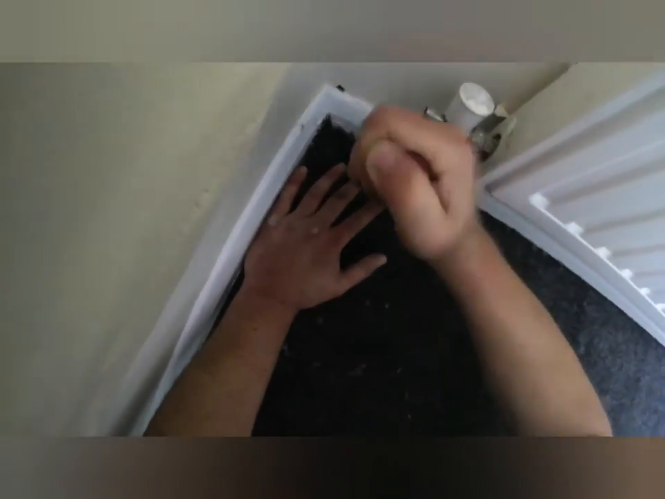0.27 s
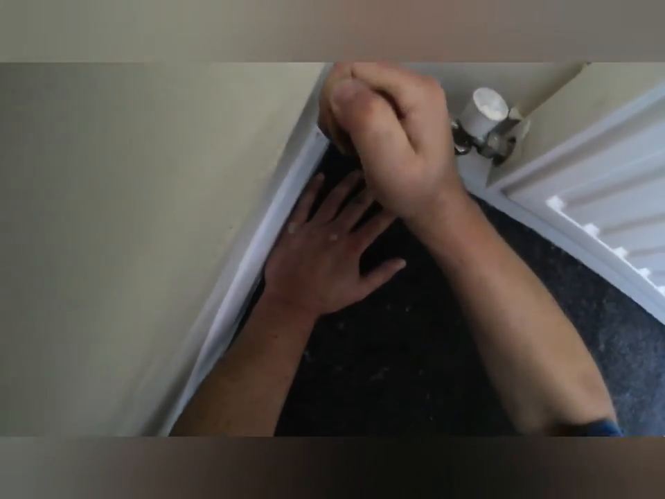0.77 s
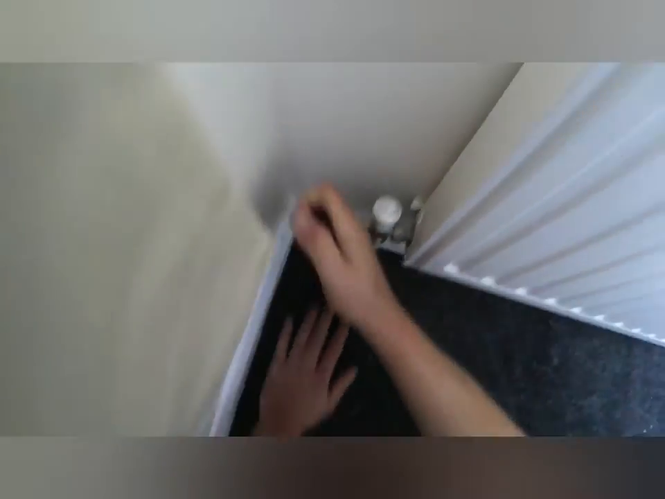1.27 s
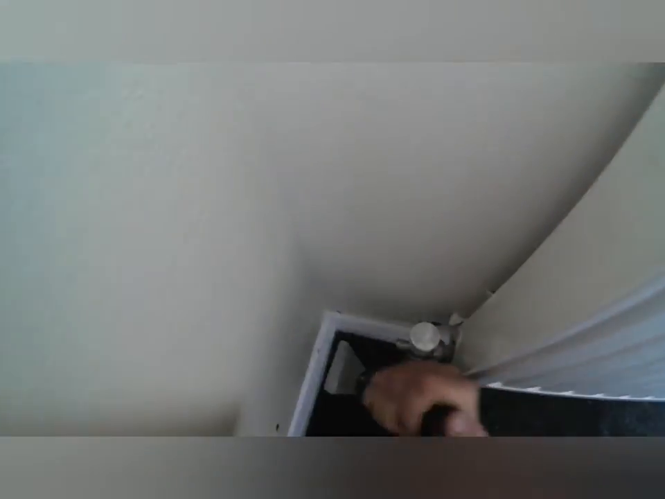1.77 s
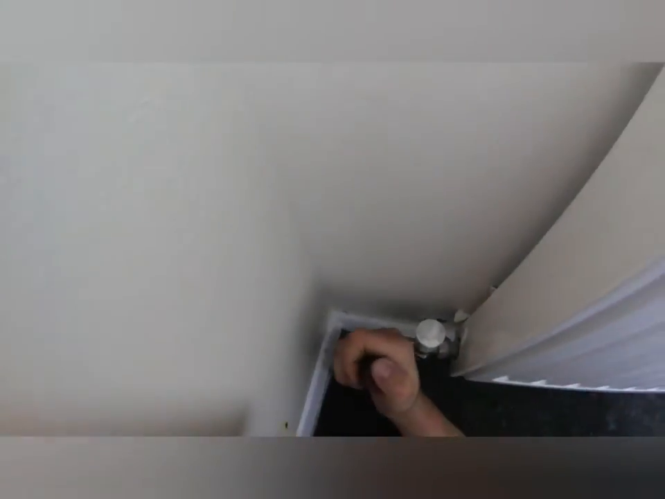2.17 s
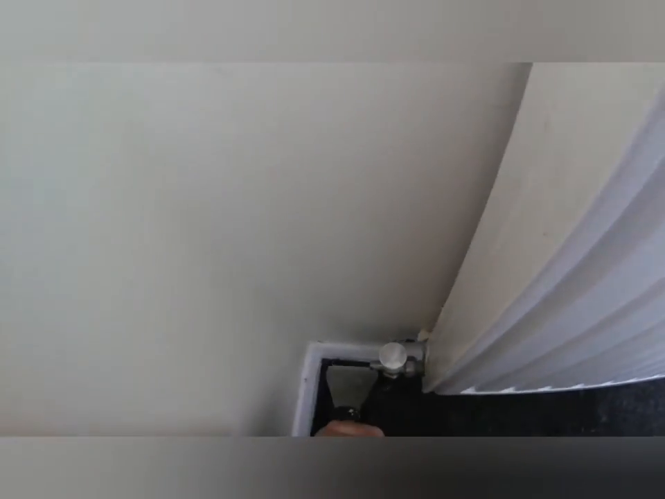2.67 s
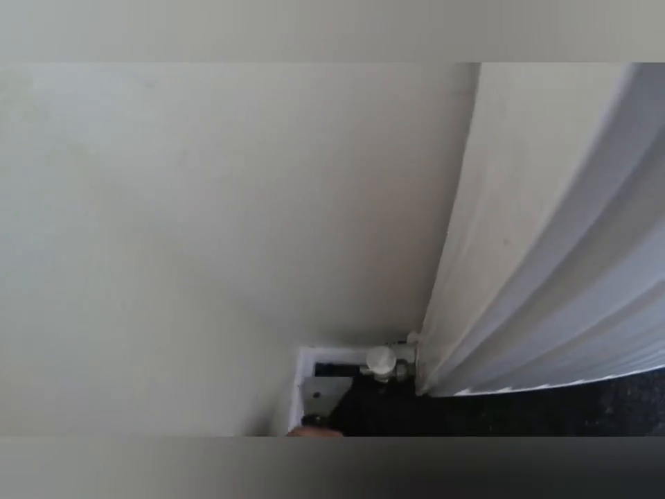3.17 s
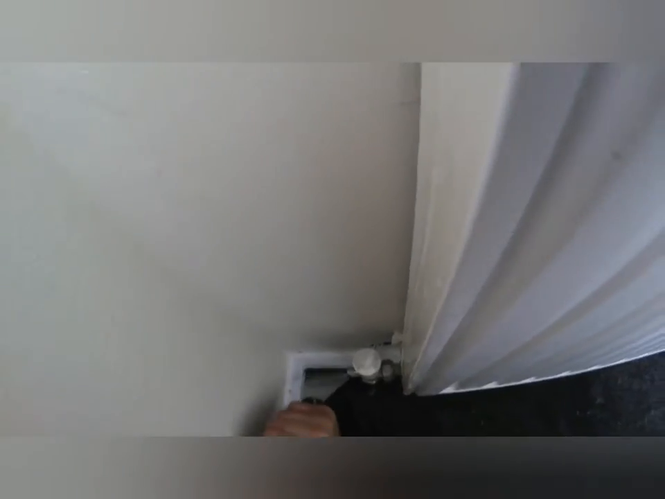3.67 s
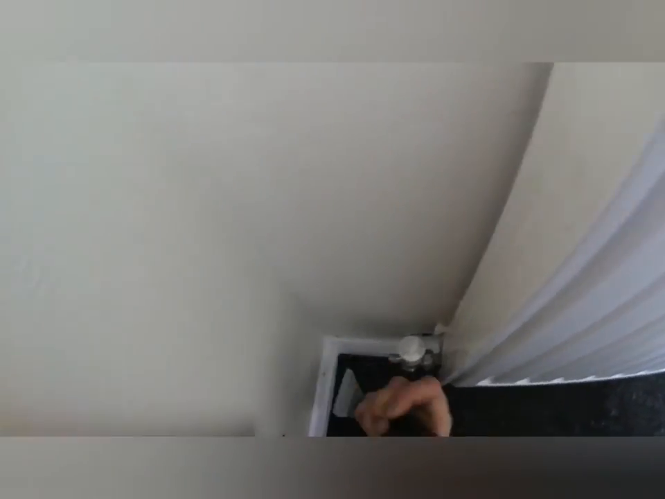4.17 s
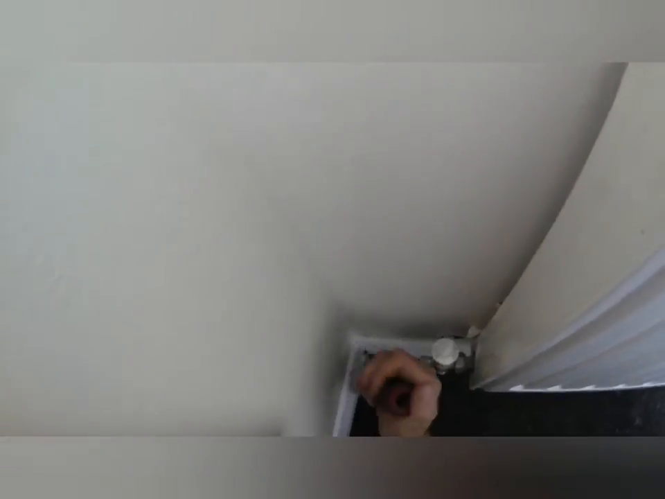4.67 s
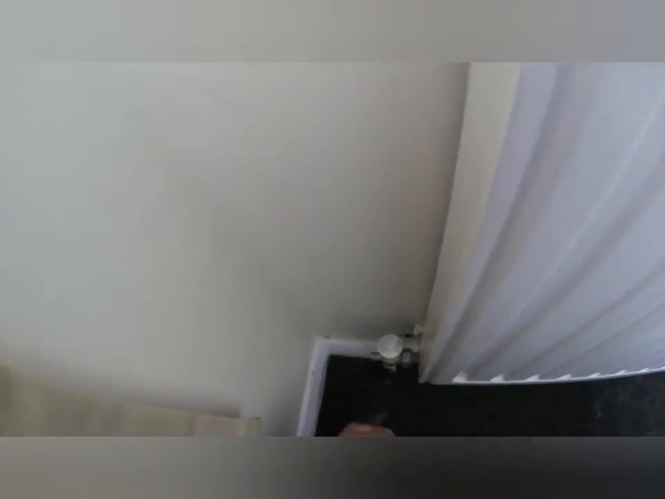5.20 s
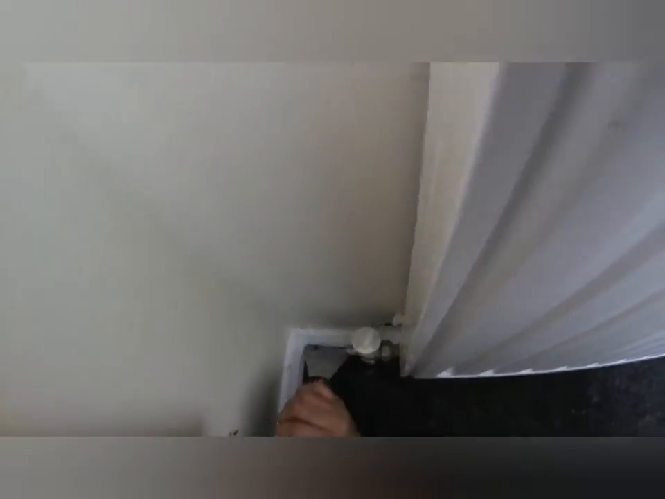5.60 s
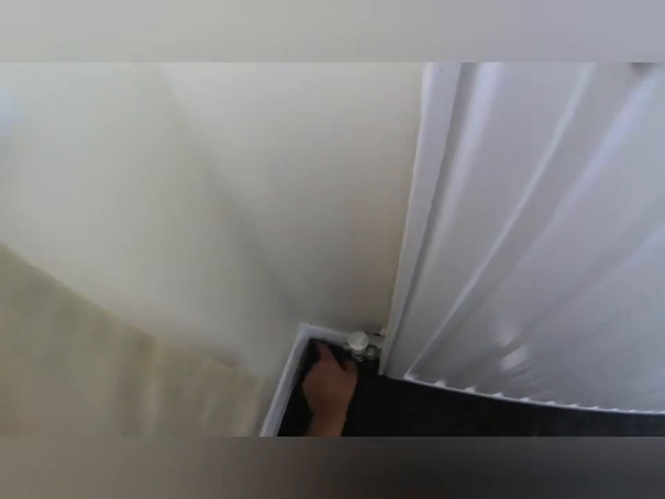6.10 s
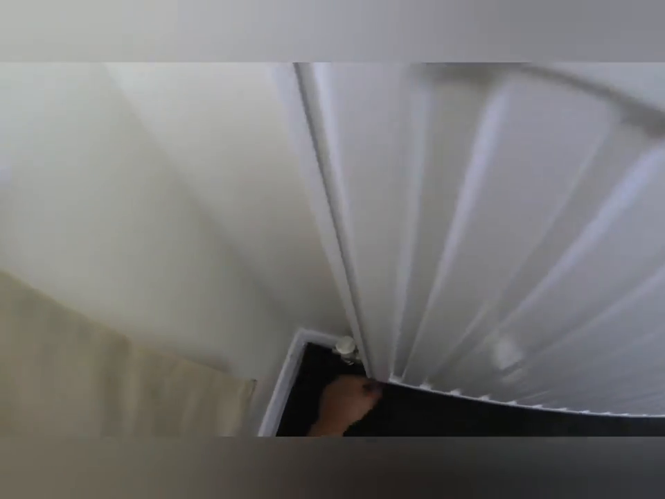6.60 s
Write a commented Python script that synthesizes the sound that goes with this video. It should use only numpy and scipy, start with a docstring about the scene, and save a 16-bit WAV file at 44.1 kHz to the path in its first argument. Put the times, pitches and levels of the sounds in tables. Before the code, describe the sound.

Hard rattling taps and deep floor thumps as a hand works a steel scraper along a carpet edge in a quiet room corner.

```python
"""Rattling taps, booming thumps and soft scuffs: a hand drives a steel blade along a carpet edge in a room corner.
Taps are clicks and short noise echoes coloured by skirting, walls and struck spot; the steel rings as sines.
Presses shake floorboards and panel as resonant noise; the lowest floor mode booms as a wandering sine.
Filtered noise makes the pile's scuffs, low floor noise and quiet hiss, with a thin electronic whine.
An expander turns the quiet background down between sounds."""
import sys
import numpy as np
from scipy import signal
from scipy.fft import rfft, irfft, next_fast_len
from scipy.io import wavfile
from scipy.ndimage import map_coordinates

SR = 44100
rng = np.random.default_rng(int(sys.argv[2]) if len(sys.argv) > 2 else 0)


def file_out(sig):
    """Save sig as 16-bit WAV at sys.argv[1]."""
    # one column per channel
    cols = np.atleast_2d(sig).T
    # limit, then scale
    lim = np.clip(cols, -1, 1)
    pcm = np.round(lim * 32767).astype(np.int16)
    wavfile.write(sys.argv[1], SR, pcm)


N = 301996

# floorboard resonances: f/Hz, width/Hz, level/dB
FLOORBOARD_MODES = [(85, 22, 1), (123, 16, -3), (147, 16, -2), (172, 18, -2), (211, 24, -4), (257, 22, -4),
                    (289, 28, -3), (375, 30, -9)]


def amp(db):
    """Amplitude factor of a level in dB."""
    return 10 ** (np.asarray(db) / 20)


def unit(x):
    """Scales x to rms 1."""
    return x / np.sqrt(np.mean(x ** 2) + 1e-20)


def along(points, hz):
    """Interpolates (f/Hz, value) points on a log-frequency axis."""
    f, v = np.transpose(points)
    return np.interp(np.log(hz + 1), np.log(f + 1), v)


def curves(rows):
    """One value per sample for each column after the time."""
    s, *cols = np.transpose(rows)
    return [np.interp(np.arange(N) / SR, s, c) for c in cols]


def wobble(rate_hz):
    """Smooth random curve, rate_hz knots a second."""
    knots = rng.standard_normal(int(N * rate_hz / SR) + 4)
    return map_coordinates(knots, [np.arange(N) * rate_hz / SR])


def filtered(x, response):
    """x through a complex frequency response."""
    m = next_fast_len(len(x) + 8192)
    spectrum = rfft(x, m) * response(np.fft.rfftfreq(m, 1 / SR))
    return irfft(spectrum, m)[:len(x)]


def body(modes):
    """Causal response of resonances (f/Hz, width/Hz, level/dB), alternating in sign."""
    def response(f):
        total = 0
        for k, (mode_hz, width_hz, db) in enumerate(modes):
            damping = 1j * f * width_hz
            total = total + (-1) ** k * amp(db) * damping / (mode_hz * mode_hz - f * f + damping)
        return total
    return response


def noise(response, size=N):
    """Coloured noise of rms 1."""
    return unit(filtered(rng.standard_normal(size), response))


def add(track, s, sound):
    """Mixes a sound in at s seconds."""
    part = track[max(round(s * SR), 0):][:len(sound)]
    part += sound[:len(part)]


def background():
    """Soft hiss and one thin electronic whine of wandering pitch and level."""
    # room and circuit noise: f/Hz, density/dB per Hz
    hiss_points = [(59, -36), (100, -0.5), (334, -18.5), (814, -27), (1710, -36.5), (4820, -59),
                   (6090, -33.5), (10100, -46.5), (11300, -33), (15800, -44)]
    hiss = amp(-66.0) * noise(lambda f: amp(along(hiss_points, f)))
    whine_hz = 11140 + 3.0 * wobble(7.1)
    whine_db = -85 + 1.2 * wobble(8)  # rms
    return hiss + np.sqrt(2) * amp(whine_db) * np.sin(2 * np.pi * np.cumsum(whine_hz) / SR)


def low_background():
    """Very deep rumble and low floor noise, resonant noises that slowly change in level."""
    # low background: t/s, very deep rumble level/dB, low floor noise level/dB
    low_levels = [(0.0, -38, -35.5), (.23, -48, -56.5), (.5, -41, -46.5), (.7, -47, -53),
                  (1.05, -46.5, -47.5), (1.5, -48, -60.5), (1.7, -40.5, -32), (2.0, -45.5, -48.5),
                  (2.56, -55, -62.5), (3.03, -43.5, -46.5), (3.5, -48, -49), (3.9, -49, -61),
                  (4.21, -51.5, -60), (4.4, -44, -37.5), (5.09, -50.5, -68.5), (5.57, -51, -55),
                  (5.87, -59, -64), (6.85, -46, -61)]
    rumble_db, floor_db = curves(low_levels)
    deep_rumble = noise(body([(12.0, 4.2, 0)]))
    upper_rumble = amp(-11.5) * noise(body([(30, 5.3, 0)]))
    rumble = amp(rumble_db) * (deep_rumble + upper_rumble)

    floor_edge_hz = 254  # floor noise thins out above
    floor = noise(lambda f: body(FLOORBOARD_MODES)(f) / (1 + 1j * f / floor_edge_hz))
    return rumble + amp(floor_db + 2.5 * wobble(25)) * floor


def swells(surface):
    """Short scrapes over the pile: the chosen surface's level rises and falls smoothly."""
    # scrapes: middle t/s, palm level/dB, fibre level/dB, half-span/ms
    scrapes = [(.04, -42.5, -74, 56), (.40, -71, -63, 70), (.45, -53, -67, 19), (0.589, -45.5, -59.5, 47),
               (.86, -67, -71, 105), (0.971, -69, -75, 130), (1.029, -63, -73, 88), (1.42, -61, -85, 113),
               (1.578, -67, -59.5, 40), (1.68, -58, -66, 98), (1.85, -64, -87, 130), (1.95, -57, -67.5, 30),
               (3.621, -64, -67.5, 29), (4.30, -48.5, -72.5, 114), (4.397, -44.5, -51, 39),
               (4.56, -63.5, -70, 47), (5.379, -68, -71, 65), (5.51, -65, -79, 61), (5.57, -55, -85, 73),
               (5.841, -56, -63.5, 43), (6.062, -49.5, -66.5, 59), (6.22, -72.5, -94, 92),
               (6.267, -45, -62, 61), (6.32, -57, -82, 29), (6.531, -57.5, -66, 89), (6.592, -59, -67, 72),
               (6.681, -68, -70, 110)]
    out = np.zeros(N)
    for middle_s, palm_db, fibre_db, half_ms in scrapes:
        db = palm_db if surface == "palm" else fibre_db
        add(out, middle_s - half_ms / 1000, amp(db) * np.hanning(round(2 * half_ms / 1000 * SR)) ** 2)
    return out


def scuffs():
    """Fibres slip under palm and blade: noise of slowly changing level, short scrapes and flutter."""
    # changing contact with the pile, slow rise and fall: t/s, palm level/dB, fibre level/dB
    contact = [(0.0, -34.5, -43.5), (.11, -88, -100), (.46, -44, -64.5), (.65, -84, -87), (.95, -59.5, -94),
               (1.4, -88, -101), (1.66, -57, -91.5), (2.1, -70.5, -82.5), (2.67, -75.5, -84),
               (2.8, -70.5, -75.5), (3.0, -88, -99.5), (3.5, -70, -86), (4.27, -75, -77.5),
               (4.4, -53.5, -78), (4.56, -70, -84), (5.38, -78.5, -79.5), (5.47, -69, -73.5),
               (6.85, -62.5, -75)]
    # hand on the pile: f/Hz, density/dB per Hz
    palm_points = [(180, -26.5), (300, -3.5), (500, 4), (800, 2), (1400, -5.5), (2000, -23), (3300, -39.5),
                   (5500, -120)]
    # fibre tips: f/Hz, density/dB per Hz
    fibre_points = [(900, -25), (1500, 3), (2500, -3), (3600, 0), (5300, -6.5), (8000, -15.5),
                    (14000, -25.5)]
    palm_db, fibre_db = curves(contact)

    def slips():
        return amp(1.5 * wobble(40) + 3.5 * wobble(250))

    palm = (amp(palm_db) + swells("palm")) * noise(lambda f: amp(along(palm_points, f)))
    fibre = (amp(fibre_db) + swells("fibre")) * noise(lambda f: amp(along(fibre_points, f)))
    return slips() * palm + slips() * fibre


def boom():
    """Loads swing the lowest floor mode at their power-weighted mean pitch; weak swings wander more."""
    # loads: start t/s, swell/s, peak level/dB, f/Hz, t60/s
    loads = [(0.0, .03, -44.5, 47, .5), (.265, 0.018, -31, 45.2, .2), (.43, 0.037, -47, 44.65, 0.41),
             (.52, 0.35, -41.5, 46.7, .3), (.96, 0.17, -35, 47.9, 0.27), (1.21, 0.086, -39.5, 48.07, 0.46),
             (1.38, 0.088, -39.5, 48.9, 0.13), (1.529, 0.17, -23.5, 50.45, 1.3),
             (2.21, 0.078, -45.5, 51.3, .8), (2.601, 0.22, -44, 46.26, 0.44),
             (2.94, .025, -41.5, 46.8, .45), (3.09, 0.2, -41, 49.5, 0.54), (3.45, 0.15, -45, 48.26, 3.2),
             (4.22, 0.21, -20.5, 49.67, 0.55), (4.5, 0.19, -38, 50.17, 2.05), (5.45, 0.12, -53.5, 46, 0.19),
             (5.661, 0.049, -43.5, 49.3, 1.9), (6.47, 0.097, -49, 48.76, 3.9)]
    resting_hz, resting_db = 47.88, -67.5  # the mode never quite stops
    start_s, swell_s, peak_db, mode_hz, t60_s = np.transpose(loads)[:, :, None]
    t = np.arange(N) / SR - start_s
    rise = np.sin(np.pi / 2 * np.clip(t / swell_s, 0, 1))
    decay_db = -60 * np.maximum(t - swell_s, 0) / t60_s
    power = (rise * amp(peak_db + decay_db)) ** 2
    total = power.sum(axis=0) + amp(resting_db) ** 2
    hz = resting_hz + (power * (mode_hz - resting_hz)).sum(axis=0) / total
    db = 10 * np.log10(total)

    loose = np.clip((-30.0 - db) / 15, .1, 1.6)
    db_now = db + 1.0 * loose * wobble(31)
    hz_now = hz + 4.9 * loose * wobble(27)
    return np.sqrt(2) * amp(db_now) * np.sin(2 * np.pi * np.cumsum(hz_now) / SR)


def thumps():
    """A soft blow gives a damped push, then shakes boards and wall panel; the panel dies sooner."""
    # presses: t/s, level/dB, panel level/dB re press, loudest f/Hz, push level/dB re press, t60/s
    presses = [(0.0, -33.5, -24, 160, 10, 0.57), (.275, -27.5, -12, 120, 9.5, 0.41),
               (0.437, -39.5, -24, 98, 14.5, 0.64), (.574, -44, 3, 129, -7, 0.28),
               (0.7, -40, -31, 82, 16, 0.41), (1.548, -23, 1.5, 220, 10.5, 0.51),
               (1.599, -29.5, -13, 94, 1, 0.5), (2.115, -32.5, -22, 79.7, 15, 0.48),
               (2.618, -29.5, -26.5, 128.4, 12.5, 0.89), (2.953, -32.5, -4.5, 113.3, 13.5, 0.48),
               (3.253, -28, -10, 367, 0, .35), (3.262, -30, -27, 134, 12, 0.48),
               (3.494, -26, -18, 121, 13.5, 0.33), (3.539, -34, -42, 142.5, 0, 0.57),
               (4.216, -32, -3.5, 203.7, 4.5, 0.92), (4.269, -29.5, -15, 90.7, 9, 1),
               (5.141, -38, -5, 280, 1, 0.41), (5.187, -38.5, -7, 183, 15.5, 0.49),
               (5.447, -44.5, -12.5, 373, 13, 0.32), (5.687, -30.5, -27, 90, 10, 0.51),
               (5.898, -39, -26, 97, 9.5, 0.86), (6.185, -50, 13, 307.6, 2, 0.23)]
    # hollow wall panel: f/Hz, width/Hz, level/dB
    panel_modes = [(455, 92, -1), (623.6, 33, 1), (698.5, 27, -5.5)]
    knock_db = -3  # panel's free ring re its shaken noise
    out, t = np.zeros(N), np.arange(SR) / SR
    for s, db, panel_db, hz, push_db, t60_s in presses:
        boards = noise(lambda f: body(FLOORBOARD_MODES)(f) * body([(hz, .7 * hz, 0)])(f) ** 2, size=SR)
        boards *= amp(-60 * t / t60_s)
        panel = noise(lambda f: body(panel_modes)(f) / (1 + (f / 1400) ** 2), size=SR)
        panel *= amp(panel_db - 60 * t / (0.73 * t60_s))
        knock = sum(amp(level_db - 25 * width_hz * t) * np.sin(2 * np.pi * mode_hz * t)
                    for mode_hz, width_hz, level_db in panel_modes)
        push = amp(push_db - 29 * hz * t) * np.sin(2 * np.pi * hz * t)
        onset = 1 - np.exp(-t / .002)
        add(out, s, amp(db) * (onset * (boards + panel) + amp(panel_db + knock_db) * knock + push))
    return out


def room(blow):
    """A fresh random tail: each frequency dies at its own speed."""
    # reverberation: f/Hz, t60/s
    decay_points = [(200, 0.36), (1000, 0.3), (3000, .4), (10000, 0.33)]
    hz, t, z = signal.stft(rng.standard_normal(SR // 2), SR, nperseg=256)
    decay = amp(-60 * t / along(decay_points, hz)[:, None])
    tail = signal.istft(z * decay, SR, nperseg=256)[1]
    return signal.fftconvolve(blow, tail / np.linalg.norm(tail))


def taps():
    """Each contact is a click and a few ms of close echoes in the corner; far room and skirting answer."""
    # blade and knuckle contacts: t/s, peak level/dB, middle/dB, treble/dB, air/dB (bands re bass),
    # struck spot f/Hz, rattle/ms, room level/dB re rattle
    contacts = [(.009, -30.5, -8, 6, -21.5, 1000, 14, 8), (.03, -38, -22.5, -17, -27.5, 865, 3.8, 6),
                (.138, -39, 11.5, -14, -8.5, 1090, 8, -19), (.147, -31.5, 4, -1, -7, 534, 4.3, -28),
                (.272, -12.5, 2, -7, -19, 780, 11, -18), (.281, -11, -6, -1, -23, 970, 4.7, -12.5),
                (.43, -19, -4, 13, -33.5, 840, 14, -26), (.516, -37.5, 2.5, 22, -5.5, 490, 6.8, -20),
                (.533, -27.5, -9, 9, -18.5, 770, 4.1, -6), (.569, -20, -13, -7, -25.5, 805, 9.2, -9),
                (.589, -28, 7, 3, -22.5, 1010, 8.7, -26), (0.626, -38.5, -4, 14, -13, 778, 4.5, -15),
                (0.71, -47, 7.5, 21, -15, 616, 8.9, -15), (.822, -48, 3, 12, 8, 670, 5.8, -17),
                (0.836, -51, -16, -2, -10, 659, 5.5, -20), (.946, -40, -56, -22.5, -22.5, 590, 8.5, 3.5),
                (1.028, -48, -8.5, -8, -9, 720, 6.8, -3), (1.54, -37.5, -21.5, 6.5, -10, 580, 14, -16),
                (1.55, -33, -34.5, -6.5, -16.5, 575, 8, -33), (1.648, -26, -14, 10, -1, 587, 4.6, -40),
                (1.699, -32, 2.5, 12.5, 12, 515, 6.6, -33), (1.787, -39, -28.5, -1.5, -15.5, 840, 8.2, 1),
                (1.816, -24.5, -25.5, -3.5, -27, 683, 6.5, -24), (2.008, -33, -54, -7.5, -22, 654, 23, -8),
                (2.023, -36.5, -27, 2, -13.5, 697, 7.6, -24), (2.115, -40.5, -23, -12, -19, 648, 6.8, -13),
                (2.178, -53, -2, 7.5, 12.5, 546, 8.9, -15), (2.62, -44.5, 6.5, 13.5, 7.5, 504, 6.8, -9),
                (2.916, -21, -23, -15, -21, 906, 5.4, -6.5), (2.934, -25.5, -24, -1.5, -2, 537, 48, 2),
                (2.949, -6, -8.5, -2, -4.5, 1100, 13, -13.5), (3.104, -44.5, -5.5, 1.5, -6, 956, 4.6, -18),
                (3.245, -44.5, 1.5, 5, 4.5, 505, 6.1, 4), (3.256, -15.5, -4.5, -6.5, -2.5, 1584, 6.1, -13),
                (3.472, -33, -42, -18, -21.5, 665, 7, -30), (3.497, -39.5, -5, 8, -6, 720, 6.2, -3),
                (4.217, -47, -11, 0, -19, 507, 7.7, -16), (4.242, -38, -10, -1, -19, 698, 11, -10),
                (4.343, -37, -12.5, -2, -14.5, 587, 4.3, -16), (4.387, -36, -14, -14, -20, 750, 2.3, -13),
                (4.404, -36, -11, 6, -10, 501, 3.6, -26), (4.763, -49.5, -23, -6, -9.5, 967, 7, -21),
                (5.142, -26.5, -23, -28, -27.5, 877, 6, -13), (5.207, -30, -12, 5.5, -7, 1450, 5, -10.5),
                (5.247, -35, -22.5, -7, -22, 890, 8.8, -14), (5.691, -46.5, -12, -5, -4.5, 526, 8, 5),
                (5.826, -38, -21.5, -9.5, -16.5, 758, 6.4, -6.5),
                (5.845, -34, -14.5, -26.5, -9, 1070, 6, -11), (5.959, -39, -32.5, -24, -24, 577, 7.3, -26),
                (6.051, -40.5, -20, -16.5, -11.5, 684, 7.6, 1),
                (6.179, -29.5, -27.5, -7, -15, 776, 4.2, -15),
                (6.186, -37.5, -45, -33.5, -20, 679, 10, -15),
                (6.26, -31, -22, -20, -15.5, 890, 5.3, -29.5)]
    # skirting and corner: f/Hz, width/Hz, level/dB
    corner_modes = [(790, 210, -8), (1064, 190, 0), (1423, 150, -3), (2020, 180, 0), (2675, 420, -6.5),
                    (3620, 130, -7.5), (5300, 200, -9), (6300, 290, -13.5), (8580, 320, -24.5)]
    # skirting ringing on: f/Hz, width/Hz, level/dB
    skirting_modes = [(960, 40, 3), (1390, 50, -2), (2180, 45, 4)]
    click_db = -12  # re echo norm
    spot_db, spot_width = 7, 0.39  # width as share of spot pitch
    skirting_db, skirting_growth = 3, .4  # re room at 0 dB peak; dB per dB of blow
    near, far, t = np.zeros(N), np.zeros(N), np.arange(SR // 20) / SR

    def step(f, edge_hz):
        return 1 / (1 + (edge_hz / (f + 1)) ** 6)

    for s, db, mid_db, treble_db, air_db, spot_hz, ms, room_db in contacts:
        span_s = max(ms, 1) / 1000
        envelope = (1 - np.exp(-t / 0.00054)) * amp(-6 * t / span_s) / (1 + (t / span_s) ** 6)
        echoes = envelope * rng.standard_normal(len(t))
        click = np.exp(-t / .00008)
        spot = body([(spot_hz, spot_width * spot_hz, spot_db)])

        def tilt(f):
            middle = mid_db * step(f, 1400)
            treble = (treble_db - mid_db) * step(f, 4000)
            air = (air_db - treble_db) * step(f, 6000)
            return amp(middle + treble + air)

        def colour(f):
            corner = body(corner_modes)(f) + amp(-11)
            return corner * (1 + spot(f)) * tilt(f) / (1 + 1j * f / 10000) ** 5

        rattle = filtered(echoes + amp(click_db) * np.linalg.norm(echoes) * click, colour)
        rattle *= amp(db) / np.abs(rattle).max()
        add(near, s, rattle)

        blow = filtered(click, colour)
        tail = room(blow * np.linalg.norm(rattle) / np.linalg.norm(blow))
        wood = amp(skirting_db + skirting_growth * db)
        answer = filtered(tail, lambda f: (1 + wood * body(skirting_modes)(f)) / (1 + 1j * f / 6000))
        add(far, s + .01, amp(room_db) * answer)
    return near, far


def blade():
    """The steel rings in its decaying modes when it leaves the pile."""
    # free blade: t/s, level/dB, modes above 5 kHz/dB re level
    releases = [(0.1474, -47.5, -20), (1.648, -73, -17), (2.0248, -67.5, -6), (5.2083, -68, 3),
                (5.5094, -82.5, 13.5)]
    # steel modes: f/Hz, level/dB, t60/s
    steel_modes = [(2040, -14, .1), (3978, 0, .17), (6218, 0, .3), (8543, -4, .11)]
    out, t = np.zeros(N), np.arange(SR // 3) / SR
    onset = 1 - np.exp(-t / 0.001)
    for s, db, upper_db in releases:
        for hz, mode_db, t60_s in steel_modes:
            level_db = db + mode_db + upper_db * (hz > 5000)
            add(out, s, amp(level_db - 60 * t / t60_s) * onset * np.sin(2 * np.pi * hz * t))
    return out


def scene():
    """Almost mono: a weak scattered copy of the close echoes differs between the sides, mostly in the treble."""
    # left-right difference: f/Hz, level/dB re close echoes
    spread_points = [(100, -44), (1000, -26), (3000, -19), (6000, -9), (12000, -5)]
    near, far = taps()
    mid = near + far + blade() + thumps() + boom() + low_background() + scuffs() + background()
    hz, _, z = signal.stft(near, SR, nperseg=256)
    random_phase = np.exp(2j * np.pi * rng.random(z.shape))
    spread = amp(along(spread_points, hz))[:, None]
    side = signal.istft(z * random_phase * spread, SR, nperseg=256)[1][:N]
    return np.array([mid + side, mid - side])


def record(dry):
    """An expander cuts up to 6 dB as smoothed level sinks under -40 dB; then a steep band limit."""
    keep = np.exp(-1 / (.08 * SR))  # 80 ms power average
    power = signal.lfilter([1 - keep], [1, -keep], np.mean(dry, axis=0) ** 2)
    level_db = 10 * np.log10(power + 1e-12)
    gain = amp(np.clip(0.59 * (level_db + 40), -6, 0))
    top_hz = 15800
    return np.array([filtered(c * gain, lambda f: f < top_hz) for c in dry])


dry = scene()
out = record(dry)
file_out(out)
```